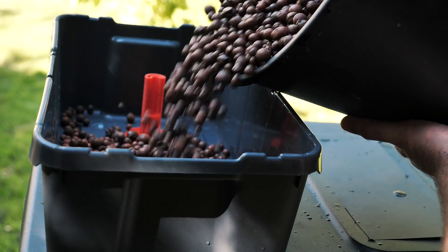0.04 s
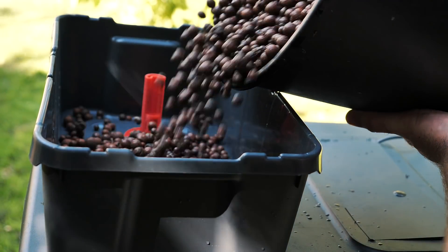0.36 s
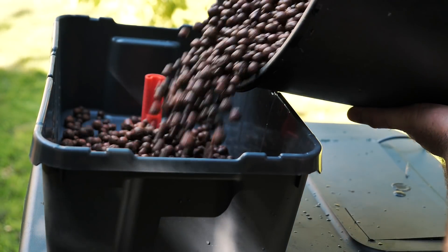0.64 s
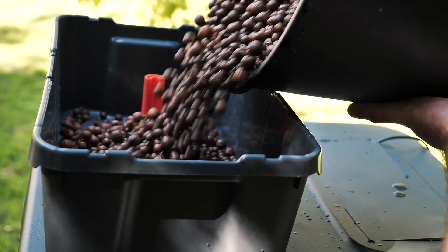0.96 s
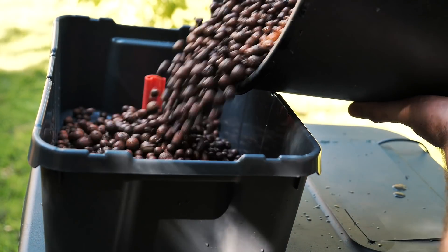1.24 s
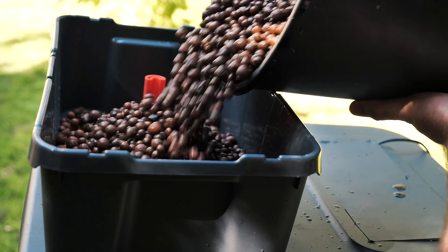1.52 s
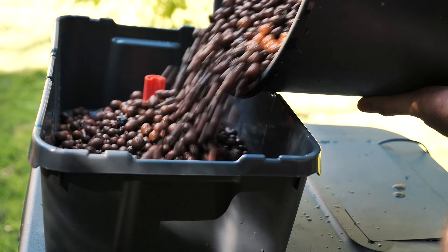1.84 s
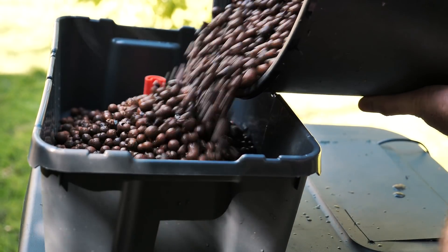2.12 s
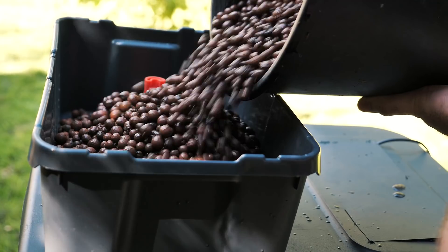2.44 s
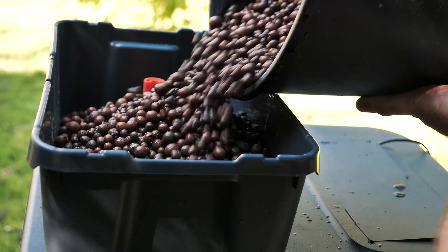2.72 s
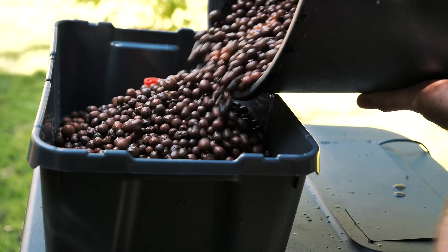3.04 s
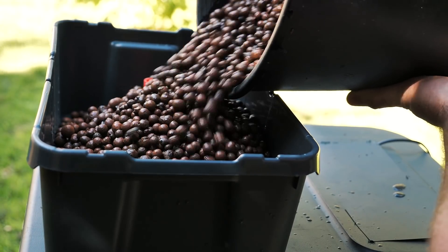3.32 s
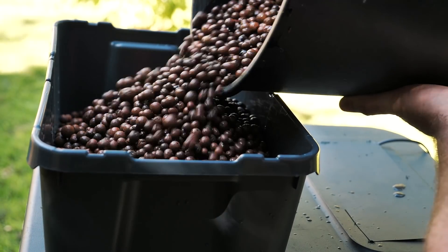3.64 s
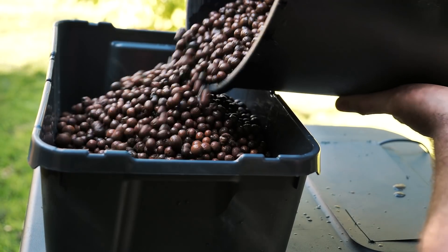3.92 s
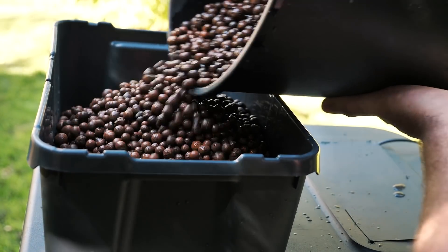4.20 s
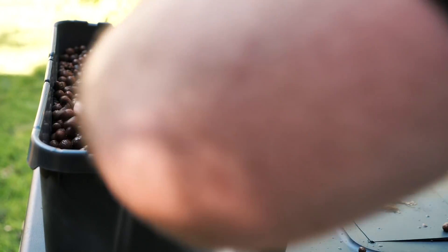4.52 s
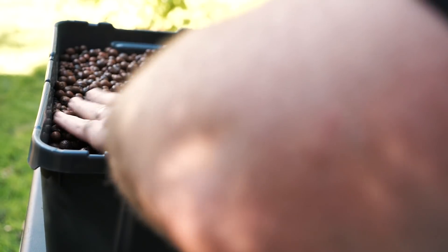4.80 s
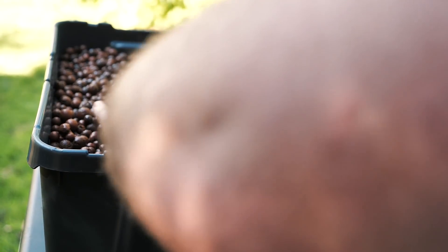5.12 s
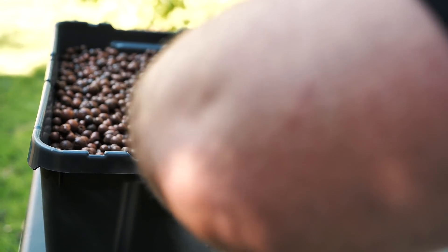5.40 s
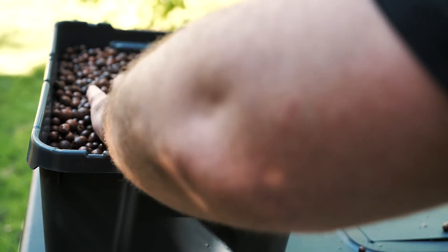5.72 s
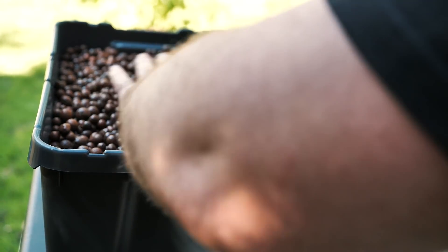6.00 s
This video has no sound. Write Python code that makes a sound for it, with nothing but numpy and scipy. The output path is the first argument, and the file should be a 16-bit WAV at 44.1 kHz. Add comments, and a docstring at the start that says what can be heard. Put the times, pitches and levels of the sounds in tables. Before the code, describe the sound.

Clay pebbles pour into a plastic tray with a dense, bright rattle that softens, then a hand spreads them with rustling clacks.

```python
"""Fired clay pebbles pour from a bucket into a plastic tray, close by in a garden.
At first they ring hard and drum on the bare floor; as the heap grows, the patter gets softer and duller.
Along the way the plastic takes a few knocks. At about 4.3 s the pour ends and a hand spreads the heap
in several strokes, rolling the pebbles over each other. All the way through, single pebbles clack
over a soft outdoor wash, and the hum of a distant motor comes and goes."""
import sys
import numpy as np
from scipy import signal
from scipy.fft import rfft, irfft
from scipy.io import wavfile
from scipy.ndimage import uniform_filter1d

SR = 44100
rng = np.random.default_rng(int(sys.argv[2]) if len(sys.argv) > 2 else 0)


def generate_wav(sig):
    """Save sig (samples, or channels by samples) to the path in sys.argv[1] as 16-bit PCM at SR."""
    pcm = np.round(np.clip(np.atleast_2d(sig).T, -1, 1) * 32767).astype(np.int16)
    wavfile.write(sys.argv[1], SR, pcm)


N = 271215
TIME = np.arange(N) / SR
POUR_FADE_S, POUR_END_S = 4.357, 4.44  # the stream dies away between these times

# How strongly the stream leaves the bucket: (time [s], level [dB])
STREAM_LEVEL = [(0, -22.5), (0.15, -23), (0.45, -26), (0.56, -24), (1.45, -24.5), (1.72, -26), (2.3, -25.5),
                (3.1, -28.5), (3.85, -30.5), (4.02, -29), (4.27, -36), (4.35, -32)]
# A "tone" table says how strong the low and high parts of a sound are.
# Tones of clay landing, clay ringing, the tray walls and the tray floor: (frequency [Hz], level [dB])
PATTER_TONE = [(3710, -27), (6300, 0.5), (6630, -16), (7280, 3), (9230, 8), (10100, 8.5), (14100, -1),
               (15100, -4), (16000, -13)]
RING_TONE = [(1530, -10.5), (2600, -7.5), (3030, -10), (3490, -2.5), (4530, 2.5), (5560, 0.5),
             (6430, -10.5), (6800, 0), (8840, -52), (15000, -120)]
WALL_TONE = [(440, -7), (560, -1), (680, 3), (790, 0.5), (950, -11), (1200, -4), (1480, -3), (1850, -6.5),
             (2150, -11), (3000, -18.5)]
FLOOR_TONE = [(90, -13.5), (165, -3), (210, -7.5), (270, -2.5), (360, 4.5), (450, -9), (620, -29),
              (1000, -15), (1500, -2.5), (2000, -12)]
def pour():
    """Pebbles land in clumps and ring, and the tray sounds beneath them."""
    stream_db = np.interp(TIME, *np.transpose(STREAM_LEVEL))
    bare = 1 - ramp(0, 0.89)  # until it is covered, the floor drums and pebbles ring harder
    heaped = ramp(1.4, 3.25)  # the heap climbs towards the bucket, so the fall gets shorter
    patter_gain = gain(stream_db - 5.5 * heaped)
    ring_gain = patter_gain * gain(-8.5 + 7.5 * bare)
    floor_gain = patter_gain * gain(-14 + 6 * bare)
    wall_gain = gain(stream_db - 9)
    # bare plastic throws the pebbles about in bursts; the heap takes them more evenly
    clumps = gain((1.1 + 1.5 * bare) * (0.62 * wander(330) + 0.42 * wander(60)))
    hits_per_s = 16000 - 9000 * heaped
    # t60 is the time in seconds that a sound takes to fade by 60 dB
    clay = patter_gain * shape(ringing_hits(hits_per_s, spread_db=2.5, t60=0.00084), PATTER_TONE)
    # the loose heap is a softer landing than plastic, so the highest sounds fade
    treble = signal.sosfiltfilt(signal.butter(2, 12500, 'high', fs=SR, output='sos'), clay)
    clay -= 0.38 * heaped ** 2 * treble
    clay += ring_gain * shape(ringing_hits(hits_per_s, spread_db=1.5, t60=0.0027), RING_TONE)
    tray = wall_gain * shape(hits(hits_per_s / 4, spread_db=3.5), WALL_TONE)
    tray += floor_gain * shape(hits(hits_per_s / 10, spread_db=-1), FLOOR_TONE)
    # a few pebbles bounce clear; their dry cracks stand out once the floor is covered
    bounces = cracks(90, spread_db=2.5, t60=0.013) * gain(-5 - 3 * bare)
    strays = gain(-1) * patter_gain * shape(bounces, PATTER_TONE)
    strays += 1.3 * ring_gain * shape(bounces, RING_TONE)
    strays += 0.5 * wall_gain * shape(bounces, WALL_TONE)
    return (clay * clumps + tray * np.sqrt(clumps) + strays) * (1 - ramp(POUR_FADE_S, POUR_END_S))


# Strokes of the hand; the last four columns are added to the level:
# (start [s], rise [s], hold [s], fall [s], level [dB], scrape [dB], murmur [dB], rumble [dB], clink [dB])
HAND_STROKES = [(4.31, 0.1, 0.07, 0.095, -37.5, 3.5, -0.5, -3, -25),
                (4.43, 0.095, 0.063, 0.14, -30, -1, -3.5, -9.5, -15),
                (4.673, 0.025, 0.019, 0.056, -34.5, -11, -0.5, -11, -18),
                (4.812, 0.016, 0.0041, 0.068, -25, -13, -4, -8.5, -25),
                (4.831, 0.088, 0.075, 0.27, -26.5, -3.5, -7.5, -8.5, -10.5),
                (5.1, 0.05, 0.038, 0.03, -39, -12, -3, -9, 0),
                (5.216, 0.018, 0.135, 0.015, -31, -3, -5, -13.5, -3),
                (5.332, 0.028, 0.008, 0.012, -23.5, -17, -7, -19, -1),
                (5.721, 0.026, 0.0053, 0.06, -29.5, -4.5, -3.5, -10.5, -35),
                (5.786, 0.078, 0.06, 0.26, -40, -6.5, -5, -4, -24)]
# Tones of rolling pebbles, fine scraping, the murmuring heap, the hollow tray, larger pebbles clinking
# and rough crusts catching on each other: (frequency [Hz], level [dB])
RUSTLE_TONE = [(2300, -7), (2900, -7), (3400, -5), (3900, -7), (4800, 0.5), (5900, 3), (7300, 0),
               (9000, -12.5), (12000, -17)]
SCRAPE_TONE = [(5500, -11), (7500, 3.5), (9800, 4.5), (11300, 2), (13500, -3), (16000, -12)]
MURMUR_TONE = [(280, -23), (580, -2.5), (760, -3.5), (940, -10.5), (1220, 1.5), (1650, -4.5), (2200, -5.5),
               (3000, -23)]
RUMBLE_TONE = [(70, -3), (110, -3), (230, -7), (330, -0.5), (430, 7.5), (540, -6), (750, -16)]
CLINK_TONE = [(3100, -19), (3700, -2), (4150, 2), (4750, -12), (5700, -10), (6800, -16)]
CRUST_TONE = [(5000, -8), (7500, -2), (10000, -2), (13000, -1), (16000, -12)]
def hand(creep_db=-54, creep_scrape_db=-57):
    """Pebbles roll over each other under the palm; the heap murmurs and the tray rumbles below."""
    power = np.zeros((5, N))
    # even the resting hand keeps a few pebbles creeping
    power[:2] = np.outer(gain([creep_db, creep_scrape_db]), ramp(POUR_FADE_S, POUR_END_S)) ** 2
    for start, rise, hold, fall, db, *layers_db in HAND_STROKES:
        power += np.outer(gain([0, *layers_db]), gain(db) * stroke(start, rise, hold, fall)) ** 2
    push, scrape_gain, murmur_gain, rumble_gain, clink_gain = np.sqrt(power)
    # a firm stroke moves many pebbles at once; a light one leaves separate ticks
    hits_per_s = np.interp(push, gain([-50, -38, -27]), [1800, 4500, 16000])
    rustle = gain(-2) * push * shape(ringing_hits(hits_per_s, spread_db=1, t60=0.0013), RUSTLE_TONE)
    scrape = scrape_gain * shape(ringing_hits(hits_per_s, spread_db=2, t60=0.0042), SCRAPE_TONE)
    murmur = murmur_gain * shape(hits(hits_per_s, spread_db=-0.5), MURMUR_TONE)
    rumble = rumble_gain * shape(hits(hits_per_s, spread_db=-0.5), RUMBLE_TONE)
    clinks = clink_gain * shape(cracks(153, spread_db=2.5, t60=0.0096), CLINK_TONE)
    tick_gain = gain(-32) * np.sqrt(np.maximum(push - gain(creep_db), 0))
    ticks = tick_gain * shape(cracks(70, spread_db=4.5, t60=0.0046), CRUST_TONE)
    flicker = gain(1.7 * wander(300))
    return flicker * (rustle + scrape + murmur + rumble) + clinks + ticks


def stroke(start, rise, hold, fall):
    """One push swells, holds, then drops at 20 dB per fall time; the heap goes on settling."""
    after = np.maximum(TIME - start - rise - hold, 0)
    settling = gain(-15.5) * fade(after, t60=0.55)
    return ramp(start, start + rise) * np.maximum(10 ** (-after / fall), settling)


# Single pebbles that strike hard: (time [s], level [dB], pitch [Hz], brightness [dB])
HARD_CLACKS = [(0.032, -11, 4900, 3), (0.154, -11, 4630, 3), (0.21, -12.5, 4430, 3),
               (0.3182, -17, 4610, -4), (0.4026, -16, 4050, 5), (1.5645, -12, 5740, -1),
               (1.6009, -19, 4610, 5), (1.6206, -15, 4270, 7), (1.6462, -16.5, 5990, 7),
               (1.7865, -16, 4470, -3), (1.9632, -13.5, 5100, -1), (2.0209, -13, 5330, -16),
               (2.1102, -16, 5500, -5), (2.5995, -12, 4470, -4), (2.676, -16, 5000, -1),
               (2.8764, -17, 5400, 5), (2.9227, -18, 5500, -4), (3.081, -16.5, 4240, 0),
               (3.3078, -20.5, 4400, 2), (3.5946, -18, 5600, -1), (3.6588, -20.5, 4500, 2),
               (3.7657, -25.5, 5470, 11), (3.9658, -19, 5510, 3), (4.0029, -16.5, 4140, -1),
               (4.3607, -16.5, 4300, -0.5), (4.381, -25, 5300, 3), (4.6176, -12, 5600, -20),
               (4.638, -27, 6160, 2), (4.653, -23, 5760, -22), (4.6847, -16.5, 4530, -0.5),
               (4.706, -11.5, 5040, -3.5), (4.7263, -14.5, 5680, -15), (4.8241, -19.5, 6600, 7),
               (5.17, -8, 4130, -11), (5.184, -22, 4090, -17.5), (5.191, -14.5, 4530, -7),
               (5.2335, -14.5, 5630, -13), (5.27, -12, 5730, -8), (5.2908, -10, 4130, -20),
               (5.32, -7.5, 4010, -7), (5.3441, -11, 4330, -19), (5.367, -11, 4180, -7),
               (5.374, -9.5, 4390, -6.5), (5.4049, -20.5, 4300, -20), (5.5423, -20, 3854, -2),
               (5.852, -27.5, 5340, -12), (5.9493, -29, 5600, 10), (5.959, -38, 6200, 7)]
# The notes one pebble rings with: (pitch ratio [x], level [dB], fade time [s])
PEBBLE_NOTES = [(1, 0, 0.0042), (1.42, -3.5, 0.0042)]
def clacks(crack_t60=0.0046, contact_s=0.00021):
    """A hit rings one pebble briefly; the rough contact adds a dry crack and a bright tick."""
    out = np.zeros(N)
    onset = 1 - np.exp(-(TIME[:SR // 25] / contact_s) ** 2)
    for start, db, hz, bright_db in list(HARD_CLACKS) + light_clacks():
        # no pebble is quite round, so the gap between its notes varies
        stretch = 1 + 0.07 * rng.standard_normal()
        body = onset * sum(gain(note_db) * ring(hz * ratio ** stretch, t60, 1 / 25)
                           for ratio, note_db, t60 in PEBBLE_NOTES)
        # something so small gives off little sound below its lowest note
        body = shape(body, [(1200, -6), (2900, -15), (3900, 6), (10000, -4)])
        # the sharper the contact, the more it cracks and the higher the tick reaches
        burst = grit(crack_t60 * np.interp(bright_db, [-12, 10], [0.8, 1.5]), contact_s)
        crack = shape(burst, [(1200, -13.5), (3000, -19), (4000, -2), (5500, 1), (6700, -9)])
        crack_db = np.interp(bright_db, [-14, 0], [-10, -1])
        top_db = np.interp(bright_db, [-12, 0, 10], [-17, -8, 2])
        tick = shape(burst, [(6700, -2), (8300, 4.5), (12000, top_db), (15500, top_db - 32)])
        clay = unit_hit(unit_hit(body) + gain(crack_db) * unit_hit(crack))
        add(out, start, gain(db - 2.5) * (clay + gain(bright_db - 2) * unit_hit(tick)))
    return out


# Spells of lighter clacks:
# (start [s], end [s], clacks [per s], first level [dB], last level [dB], brightness [dB])
LIGHT_CLACK_SPELLS = [(0, 0.699, 12, -21, -19, 6), (1.501, 4.2, 16, -17, -27.5, 1),
                      (4.549, 5.416, 16, -32, -27, 0), (5.822, 6.15, 22, -35, -40, 6)]
def light_clacks(low_hz=3700, high_hz=5970):
    """Loose pebbles hit at random times and pitches; lists them in the same form as the hard clacks."""
    rows = []
    for start, end, per_s, first_db, last_db, bright_db in LIGHT_CLACK_SPELLS:
        count = int(per_s * (end - start))
        for when, force, pitch, sharpness in rng.random((80, 4))[:count]:
            db = first_db + (last_db - first_db) * when + 3 * (2 * force - 1)
            hz = low_hz + (high_hz - low_hz) * pitch
            rows.append((start + (end - start) * when, db, hz, bright_db + 5.5 * (2 * sharpness - 1)))
    return rows


# Heavy knocks on the plastic: (time [s], level [dB], pitch [Hz], fade time [s])
TRAY_KNOCKS = [(0.223, -15.5, 307, 0.028), (.694, -12.5, 326, 0.026), (1.123, -19, 398, 0.088),
               (1.124, -15.5, 195, 0.074), (1.135, -18, 90, .08), (1.137, -20, 147, 0.13),
               (2.021, -18.5, 616, .014), (2.588, -10, 155, 0.096), (2.591, -7.5, 350, 0.018),
               (2.597, -18, 664, 0.037), (2.606, -16, 88, 0.067), (2.629, -21.5, 142, 0.13),
               (3.114, -12.5, 480, 0.044), (3.659, -20.5, 520, 0.025)]
# Tone of the dull thud around a knock's pitch: (pitch ratio [x], level [dB])
THUD_TONE = [(0.6, -9.5), (1, -2), (1.5, -4), (2.2, -12)]
def tray_knocks(length_s=0.2, rise_cycles=0.59):
    """A heavy knock bends a plastic panel, which thuds and rings with two notes."""
    out = np.zeros(N)
    for start, db, hz, t60 in TRAY_KNOCKS:
        panel = ring(hz, t60, length_s) + gain(-11) * ring(hz * 1.87, t60 / 2, length_s)
        tone = [(hz * ratio, level_db) for ratio, level_db in THUD_TONE]
        thud = unit_hit(shape(grit(t60 * 0.61, contact_s=1 / hz), tone))
        panel[:len(thud)] += gain(-12) * thud * np.linspace(1, 0, len(thud))
        onset = 1 - np.exp(-TIME[:len(panel)] * hz / rise_cycles)
        add(out, start, gain(db) * panel * onset)
    return out


# Pebbles that tap the tray wall: (time [s], level [dB])
WALL_TAPS = [(1.1233, -18.5), (2.0204, -16.5), (2.599, -18), (3.1127, -22), (3.4627, -23.5), (3.513, -22.5),
             (3.5962, -19.5), (3.677, -23.5), (4.12, -25.5), (4.0023, -17), (5.3183, -19.5)]
# Tone of one tap: (frequency [Hz], level [dB])
TAP_TONE = [(500, 2.5), (740, 0.5), (940, -18), (1250, 2), (1800, -1), (2300, -11.5), (3200, -12.5)]
def wall_taps():
    """A light tap only rattles the wall."""
    out = np.zeros(N)
    for start, db in WALL_TAPS:
        rattle = shape(grit(t60=0.028, contact_s=0.0002), TAP_TONE)
        add(out, start, gain(db - 4) * unit_hit(rattle))
    return out


def tray_echo(sound, echo_db=-15.5, t60=0.021):
    """Sound bounces briefly between the heap and the walls."""
    t = TIME[:SR // 10]
    tail = rng.standard_normal(len(t)) * fade(t, t60) * (t > 0.0006)
    return sound + gain(echo_db) * signal.oaconvolve(sound, tail / np.linalg.norm(tail))[:N]


# Tone of the outdoor background: (frequency [Hz], level [dB])
GARDEN_TONE = [(25, -3), (45, 2.5), (100, -3), (170, -7), (280, -6.5), (500, -5.5), (780, -5), (930, -11.5),
               (1120, -3), (1500, -8.5), (3300, -29), (9000, -36), (15000, -56)]
def garden():
    """A soft outdoor wash of noise that grows louder after the pour."""
    level_db = np.interp(TIME, [4.3, 5.5], [-42.5, -37]) + 0.69 * wander(2.8)
    return unit(shape(rng.standard_normal(N), GARDEN_TONE)) * gain(level_db)


# How the motor's hum comes and goes: (time [s], level [dB])
MOTOR_LEVEL = [(0, -58), (0.15, -51.5), (1.1, -39), (1.45, -46.5), (1.8, -40), (2.2, -42.5), (2.6, -49),
               (2.95, -44), (3.5, -68), (4.2, -66), (4.5, -49), (5.6, -45), (6, -40.5), (6.15, -43)]
def distant_motor(hum_hz=55.2, waver=0.06):
    """A far-off motor hums on one low, wavering note."""
    phase = 2 * np.pi * np.cumsum(hum_hz * (1 + waver * wander(16))) / SR
    level_db = np.interp(TIME, *np.transpose(MOTOR_LEVEL)) - 3.5 + 2 * wander(7.1)
    return unit(np.sin(phase)) * gain(level_db)


def hits(per_s, spread_db):
    """Clicks at random times; spread_db sets how unequal their force is."""
    struck = rng.random(N) < per_s / SR
    force = gain(spread_db * np.minimum(rng.exponential(size=N), 4))
    return unit(struck * force * rng.choice([-1, 1], N) / np.sqrt(per_s))


def ringing_hits(per_s, spread_db, t60):
    """Countless pebble hits, each with its own force, pitch and brief ring."""
    force = hits(per_s, spread_db)
    starts = np.flatnonzero(force)
    hz = rng.uniform(1500, 17000, len(starts))
    step = np.exp((2j * np.pi * hz - np.log(1000) / t60) / SR)  # moves each ring on by one sample
    swing = force[starts] * np.exp(2j * np.pi * rng.random(len(starts)))
    out = np.zeros(N + SR)
    for age in range(int(t60 * SR * 2 / 3)):
        out[starts + age] += swing.imag
        swing = swing * step
    return unit(out[:N])


def cracks(per_s, spread_db, t60):
    """Separate hits, each a short burst of gritty noise."""
    bursts = signal.lfilter([1], [1, -fade(1 / SR, t60)], np.abs(hits(per_s, spread_db)))
    return unit(bursts * rng.standard_normal(N))


def grit(t60, contact_s):
    """The short burst of noise from one rough contact."""
    t = TIME[:SR // 25]
    return rng.standard_normal(len(t)) * fade(t, t60) * (1 - np.exp(-(t / contact_s) ** 2))


def ring(hz, t60, length_s):
    """One struck note that dies away."""
    t = np.arange(int(length_s * SR)) / SR
    return np.sin(2 * np.pi * hz * t) * fade(t, t60)


def shape(sound, tone):
    """Filter a sound through a tone table; plain white noise keeps its overall level."""
    size = 8192 if len(sound) > SR else 2048
    hz, db = np.transpose(tone)
    axis, points = np.log(np.fft.rfftfreq(size, 1 / SR) + 1), np.log(hz)
    outside = np.maximum(points[0] - axis, 0) + np.maximum(axis - points[-1], 0)
    curve = unit(gain(np.maximum(np.interp(axis, points, db) - 80 * outside, -80)))
    # build the filter so that nothing sounds before the hit that causes it
    cepstrum = irfft(np.log(curve))
    cepstrum[1:size // 2] *= 2
    cepstrum[size // 2 + 1:] = 0
    return signal.fftconvolve(sound, irfft(np.exp(rfft(cepstrum))))[:len(sound)]


def wander(turns_per_s):
    """A random drift up and down, about one in size."""
    points = rng.standard_normal(N // 40)
    return np.interp(TIME * turns_per_s, np.arange(len(points)), points) * np.sqrt(3 / 2)


def fade(t, t60):
    """Falls by 60 dB every t60 seconds."""
    return np.exp(-np.log(1000) * t / t60)


def ramp(start, end):
    """Rises from zero to one between two times."""
    return np.clip((TIME - start) / (end - start), 0, 1)


def gain(db):
    """Turn decibels into a number to multiply by."""
    return 10 ** (np.asarray(db) / 20)


def unit(sound):
    """Scale to an average (rms) level of one."""
    return sound / np.sqrt(np.mean(sound ** 2) + 1e-18)


def unit_hit(hit):
    """Scale a hit so that its loudest millisecond has a level of one."""
    return hit / np.sqrt(uniform_filter1d(hit ** 2, SR // 1000).max())


def add(out, start_s, sound):
    """Mix a sound in at a given time."""
    start = int(start_s * SR)
    part = sound[:max(0, N - start)]
    out[start:start + len(part)] += part


def scene():
    """Pebbles and plastic echo in the tray, with the garden and the motor behind them."""
    tray = pour() + hand() + clacks() + tray_knocks() + wall_taps()
    return (tray_echo(tray) + garden() + distant_motor())[None]


def record(dry):
    """Cut away the very highest sounds, above 15850 Hz."""
    return signal.sosfilt(signal.ellip(12, 0.1, 80, 15850, fs=SR, output="sos"), dry)


dry = scene()
out = record(dry)
generate_wav(out)
```